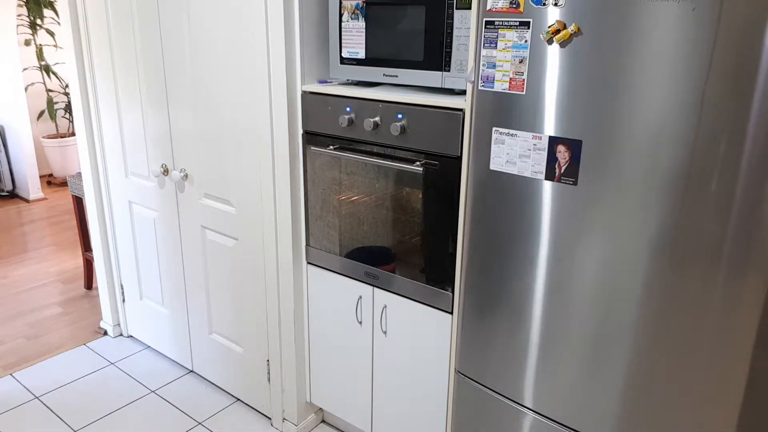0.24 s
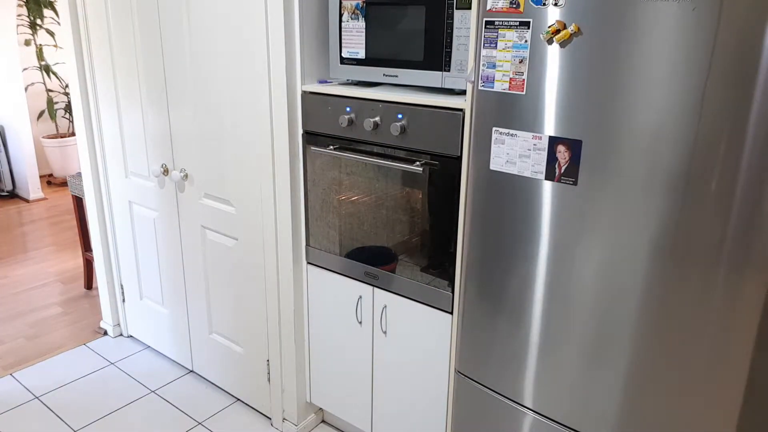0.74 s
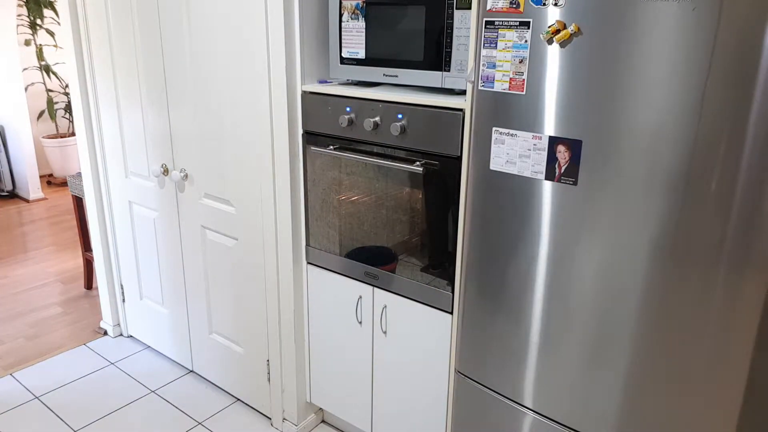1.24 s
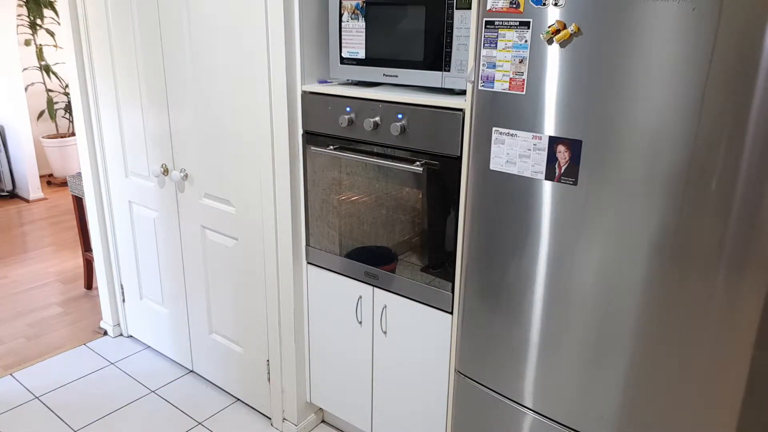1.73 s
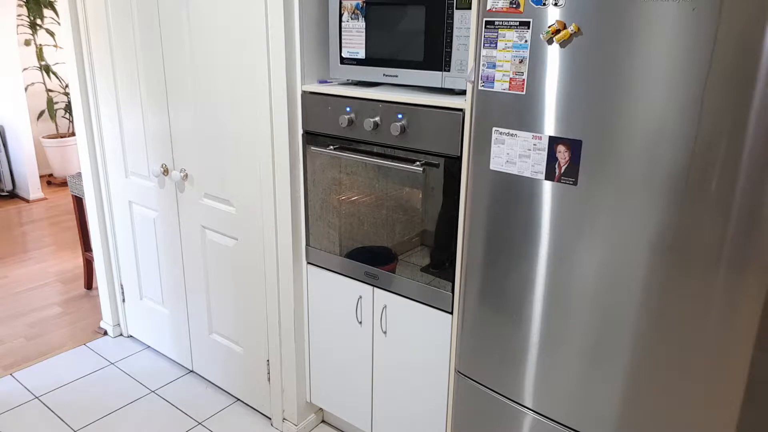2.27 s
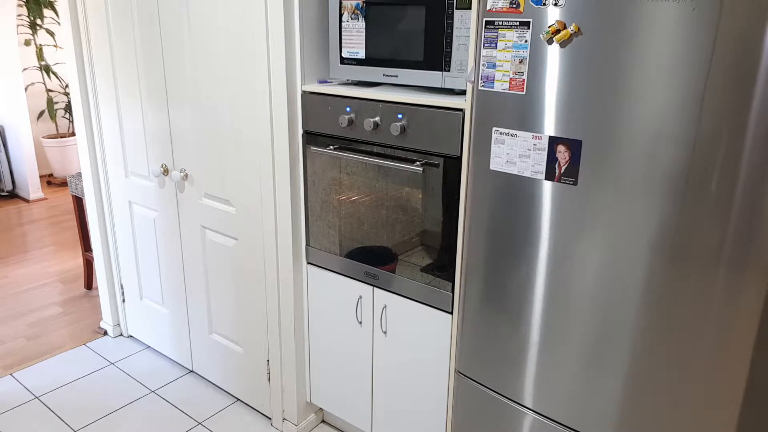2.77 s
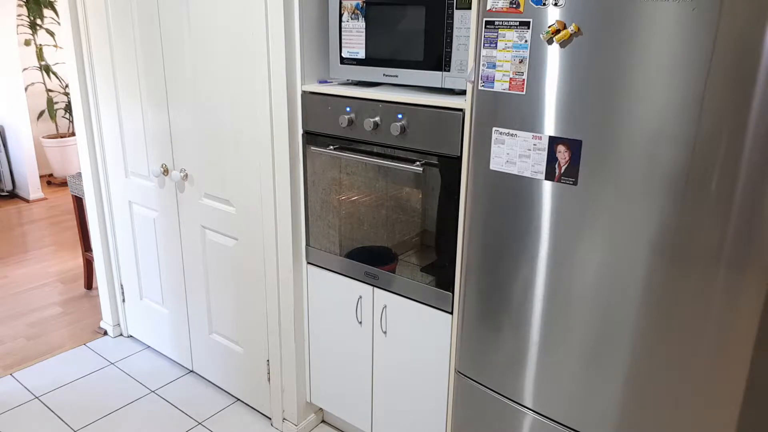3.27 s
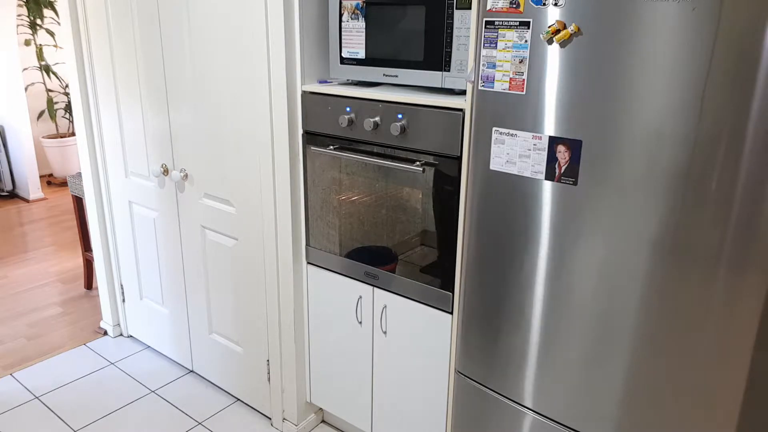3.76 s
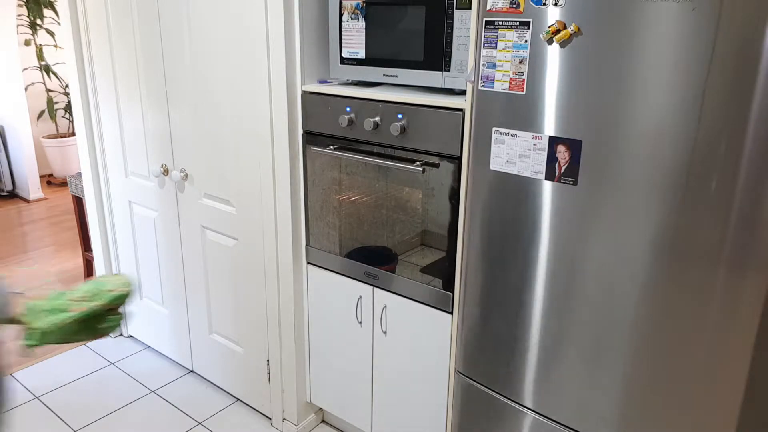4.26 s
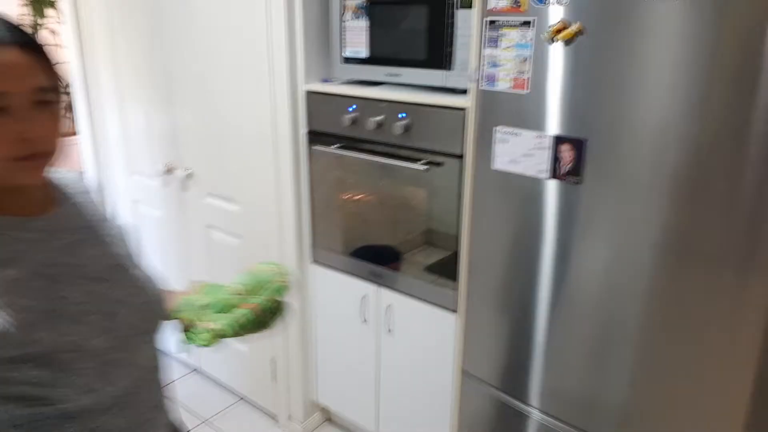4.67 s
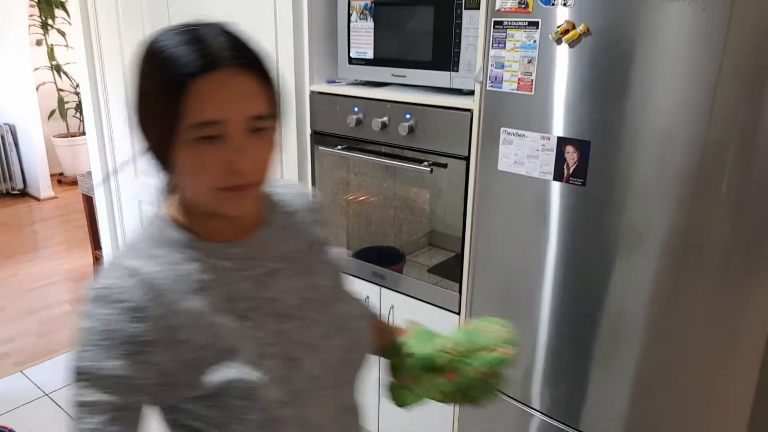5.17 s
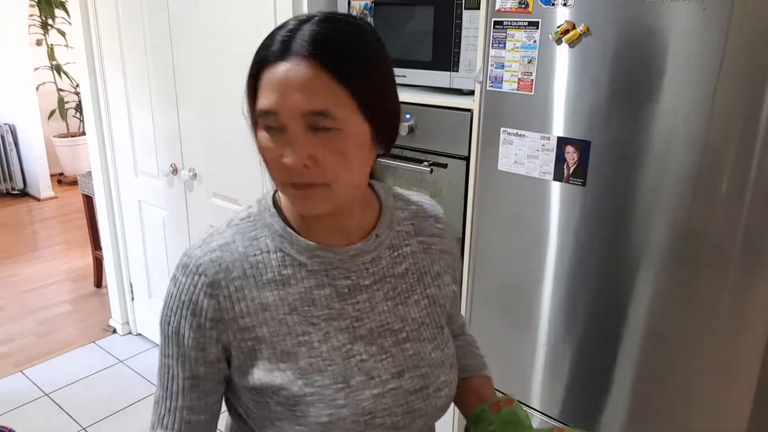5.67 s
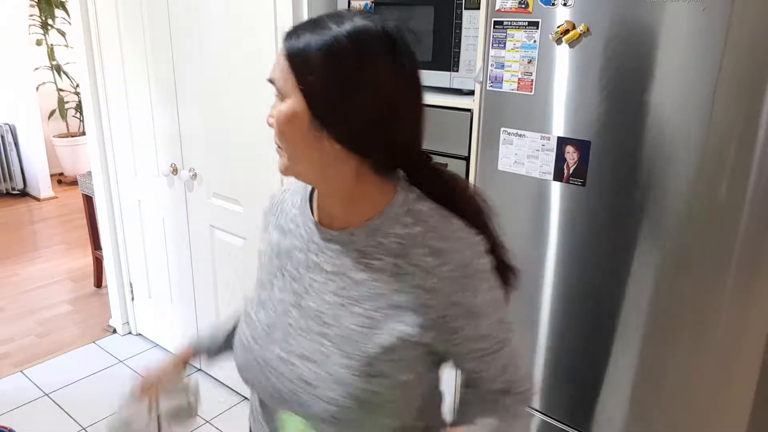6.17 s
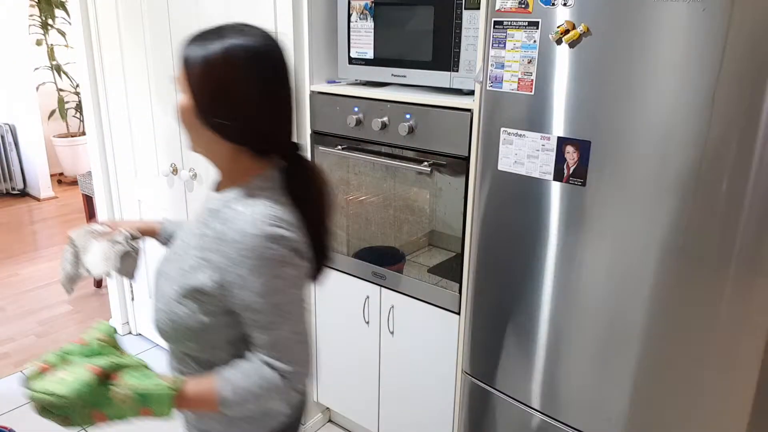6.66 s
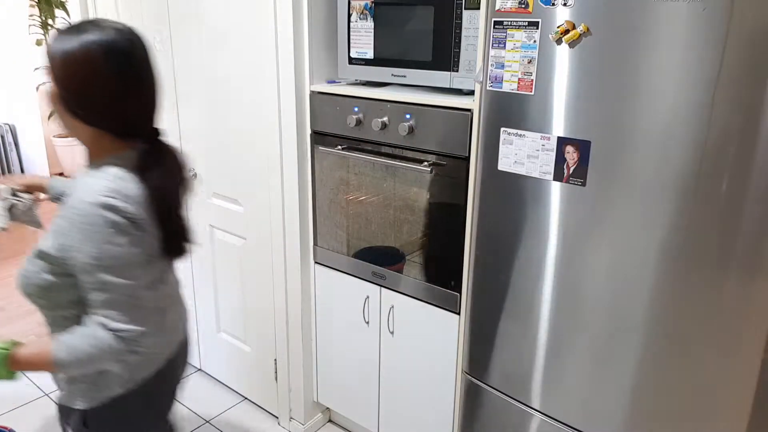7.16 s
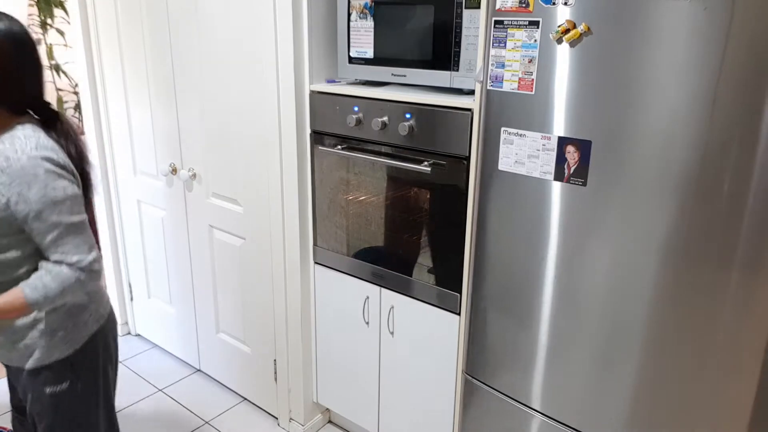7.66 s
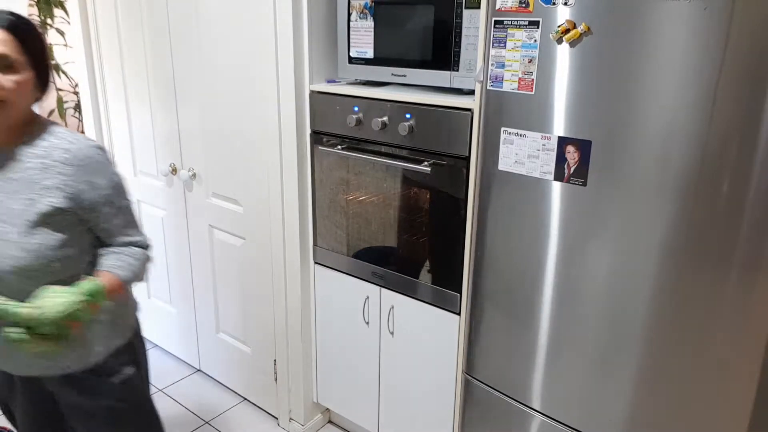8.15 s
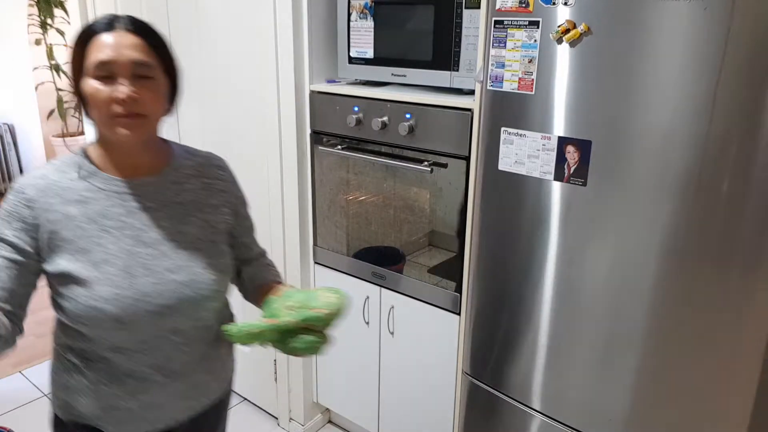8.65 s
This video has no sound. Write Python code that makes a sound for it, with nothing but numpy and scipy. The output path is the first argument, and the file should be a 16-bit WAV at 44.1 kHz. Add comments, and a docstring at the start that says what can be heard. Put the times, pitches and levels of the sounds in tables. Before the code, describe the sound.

A cupboard door slams in a kitchen, then a catch snaps and another door thuds shut, with slippers scuffing on tiles.

```python
"""Cupboard doors in a tiled kitchen.

A cupboard door slams and rebounds; later a catch snaps close by and a second door thuds shut.
Someone shuffles about in slippers, soles scuffing the tiles, over the low hum of the appliances.
The hard room rings on after every knock; two microphones a hand apart pick it up."""
import sys
import numpy as np
from scipy import signal
from scipy.fft import rfft, irfft, next_fast_len
from scipy.io import wavfile
from scipy.ndimage import uniform_filter1d, minimum_filter1d

SR = 44100
rng = np.random.default_rng(int(sys.argv[2]) if len(sys.argv) > 2 else 0)


def output_pcm(signal):
    """Save a mono or channel-first signal as 16-bit PCM at the path in sys.argv[1].

    Samples are clipped to [-1, 1] before scaling.
    """
    pcm = np.clip(np.atleast_2d(signal).T, -1, 1) * 32767
    wavfile.write(sys.argv[1], SR, np.round(pcm).astype(np.int16))


N = 392931
MIC_SPACING_M, SOUND_SPEED_M_S = 0.15, 343

# reverberation time of the kitchen: f/Hz, t60/s
KITCHEN_T60 = [(60, 1), (200, 0.53), (600, 0.32), (1500, 0.48), (3000, 0.38), (6000, 0.34), (10000, 0.38),
               (16000, 0.22)]


def slammed_door(chatter_s=0.022, chatter_db=-7.5, chatter_db_oct=-2, puff_s=0.009, puff_db=-43):
    """Each contact chatters, shaking panel and room; the hardest rings the cabinet and puffs air."""
    # door meets frame, slams home, rebounds: t/s, level/dB, tilt/(dB/oct)
    slams = [(0.6671, 14.5, 1), (0.6735, 20, 2), (0.7907, 9.5, -0.5)]
    # blow spectrum: f/Hz, level/dB
    spectrum = [(30, -20.5), (80, -7.5), (150, -4), (230, 0), (320, -3.5), (450, -5), (620, -3.5),
                (1100, -7), (2000, -6.5), (3200, -13.5), (4500, -19.5), (7000, -35.5), (9500, -35.5),
                (15500, -59)]
    # door and cabinet modes: f/Hz, level/dB, t60/s
    modes = [(107, -9, 0.7), (170, 0, 0.6), (205, -5, 0.45), (236, -2, 0.45), (406, -3, 0.5),
             (470, -3, 0.4), (508, -4, 0.4), (700, -7, 0.55), (798, 0, 0.4), (835, -4, 0.38),
             (1072, -3, 0.58), (1205, -4, 0.4), (1316, -5, 0.42), (1420, -5, 0.55), (1764, -6, 0.38),
             (1997, 1, 0.32), (2042, -5, 0.48), (2278, -6, 0.38), (3035, -7, 0.38)]
    out = np.zeros((2, N))
    for s, db, tilt_db_oct in slams:
        for k in range(3):
            blow = amp(-7) * shudder(rise_s=0.0023) + amp(-6) * room(build_s=0.0013, t60_scale=1.02)
            blow = colour(blow, spectrum, tilt_db_oct + k * chatter_db_oct)
            add(out, s + k * chatter_s, amp(db + k * chatter_db) * blow)
    s, db, _ = max(slams, key=lambda row: row[1])
    add(out, s, amp(db - 3) * ring(modes, max_t60_s=0.48))  # damped by the hinges
    age = np.arange(SR) / SR / puff_s
    add(out, s, amp(db + puff_db) * age * (2 - age) * np.exp(-age))
    return out


def catch(spring_db=-16, left_lag_s=0.00018, left_db=-2, repeat_rise_s=0.00042):
    """Near, slightly right: metal ticks and door clacks with quick repeats; a spring twangs once."""
    # snaps of catch and hinges: t/s, tick/dB, clack/dB, repeats/dB, rise/s
    snaps = [(4.6198, 8, 1.5, -27.5, 0.00039), (4.6798, 1.5, -6, 1, 0.00034),
             (4.7667, 0, -9.5, -21, 0.0019), (4.7933, -27, -12.5, -18, 0.00089),
             (4.8735, -3, -15.5, -4.5, 0.00046)]
    # quick repeats of each snap, a chatter and then a room echo: delay/s, level/dB
    repeats = [(0.005, -2), (0.0143, -1.5)]
    # echoes off bench and cabinet fronts: delay/s, level/dB
    echoes = [(0.0049, -14), (0.0087, -8), (0.0114, -16.5)]
    # metal tongue spectrum: f/Hz, level/dB
    tick_spectrum = [(300, -35), (2500, -22), (5000, -12), (7200, -9), (8100, -3), (9700, 0), (11000, -1.5),
                     (13000, -6), (16000, -14)]
    # door clack spectrum: f/Hz, level/dB
    clack_spectrum = [(20, -51), (80, -16.5), (230, 0), (430, -13), (650, -2.5), (1030, -1.5), (1250, -9),
                      (1700, -2), (2500, -3), (3900, 2.5), (6000, -0.5), (10000, -0.5), (16000, -17.5)]
    # spring modes: f/Hz, level/dB, t60/s
    spring_modes = [(1560, -5.5, 1.3), (1710, -13.5, 1.1), (4250, -8.5, 0.7)]
    events = []
    for s, tick_db, clack_db, repeats_db, rise_s in snaps:
        events.append((s, tick_db, clack_db, rise_s))
        for delay_s, db in repeats:
            gain_db = repeats_db + db
            events.append((s + delay_s, tick_db + gain_db, clack_db + gain_db, repeat_rise_s))
    out = np.zeros((2, N))

    def snap(s, db, spectrum, rise_s, tilt_db_oct, room_db):
        direct = amp(db) * unit_energy(colour(shudder(rise_s), spectrum, tilt_db_oct))
        add(out, s, direct * [[0], [1]])
        add(out, s + left_lag_s, direct * [[amp(left_db)], [0]])
        for delay_s, echo_db in echoes:
            add(out, s + delay_s, amp(echo_db) * direct)
        tail = colour(room(build_s=0.0016, t60_scale=0.82), spectrum, tilt_db_oct)
        add(out, s, amp(db + room_db) * tail)

    add(out, snaps[0][0], amp(spring_db) * ring(spring_modes, max_t60_s=1.5))
    for s, tick_db, clack_db, rise_s in events:
        snap(s, tick_db, tick_spectrum, rise_s, tilt_db_oct=4, room_db=-4)
        snap(s, clack_db, clack_spectrum, 2.27 * rise_s, tilt_db_oct=0, room_db=2)
    return out


def padded_door(panel_db=-4, room_db=-9, ring_db=-7):
    """The second door shuts on its pads: the softer the blow, the weaker the high modes."""
    # blows: t/s, level/dB, cutoff/Hz
    thuds = [(4.686, -13, 294), (4.7565, 4.5, 1220), (4.776, -13, 348), (4.7952, -4.5, 800),
             (4.848, -13.5, 199)]
    # blow spectrum: f/Hz, level/dB
    spectrum = [(20, -47.5), (45, -19), (80, -0.5), (130, -2.5), (260, 1.5), (420, -6), (680, 2), (950, -9),
                (1400, -9), (4000, -2)]
    # door modes: f/Hz, level/dB, t60/s
    modes = [(83.5, -2.5, 0.4), (123, -0.5, 0.35), (255, -4.5, 0.35), (540, -3, 0.3), (674, 4, 0.3),
             (700, -25.5, 0.35), (954, -12, 0.3), (1120, 0, 0.3)]
    out = np.zeros((2, N))
    for s, db, cutoff_hz in thuds:
        blow = amp(panel_db) * shudder(rise_s=0.0035) + amp(room_db) * room(build_s=0.0062)
        stirred = [(hz, level - 20 * np.log10(1 + (hz / cutoff_hz) ** 2), t60) for hz, level, t60 in modes]
        ringing = amp(ring_db) * ring(stirred, max_t60_s=0.27)
        add(out, s, amp(db) * (colour(blow, spectrum, cutoff_hz=cutoff_hz) + ringing))
    return out


def heels(room_db=-5, contact_s=0.003):
    """A soft heel rings the floor briefly."""
    # landings: t/s, level/dB
    landings = [(0.432, -22.5), (2.839, -8)]
    # floor modes: f/Hz, level/dB, t60/s
    modes = [(105, -5, 0.13), (186, -4, 0.14), (302.6, 5, 0.072), (343, -4, 0.039), (630, -4.5, 0.076),
             (924, -14.5, 0.1399)]
    out = np.zeros((2, N))
    for s, db in landings:
        bump = ring(modes, max_t60_s=0.4) * onset(contact_s)
        tail = signal.fftconvolve(bump[:1], room(build_s=0.0074), axes=1)[:, :SR]
        add(out, s, amp(db) * (bump + amp(room_db) * tail))
    return out


def slippers(firm_slap_db=-19.5, firm_slap_hz=3900):
    """Soles scuff, skid, squeak and slap on the tiles; gentler slaps are duller."""
    # sole brushes the tiles; the first row is a brief sound already fading as the scene begins: t/s, length/s,
    # level/dB, weight/0-1
    scuffs = [(0.0, 0.019, -51.5, 0.1), (0.2, 0.11, -53.5, 0.94), (2.65, 0.24, -55.5, 0.99),
              (3.08, 0.17, -53.5, 0.55), (3.5, 0.11, -55.5, 0.28), (3.755, 0.1, -53, 0.85),
              (4.04, 0.11, -58.5, 0.4), (4.335, 0.16, -54, 0.67), (4.5, 0.13, -50.5, 0),
              (4.98, 0.26, -63.5, 0.25), (5.095, 0.08, -59, 1), (5.25, 0.23, -49.5, 0.25),
              (5.485, 0.19, -48.5, 0.45), (5.81, 0.27, -52.5, 0.53), (6.1, 0.12, -55.5, 0.72),
              (6.49, 0.14, -58, 0.75), (6.67, 0.15, -51, 0.06), (6.915, 0.23, -40.5, 0.2),
              (7.18, 0.12, -51.5, 0.25), (7.66, 0.11, -61.5, 0.8), (8.26, 0.11, -56.5, 0.28),
              (8.46, 0.13, -55.5, 0.3)]
    # scuff motion: progress/0-1, speed/0-1
    scuff_speed = [(0, 0.13), (0.14, 0.5), (0.36, 0.95), (0.66, 0.6), (1, 0)]
    # sole lands moving and halts: t/s, length/s, level/dB, weight/0-1
    skids = [(0.15, 0.16, -51.5, 0.75), (2.84, 0.13, -51.5, 0.71), (7.408, 0.15, -39.5, 0.35),
             (8.793, 0.12, -43.5, 0.15)]
    # skid motion: progress/0-1, speed/0-1
    skid_speed = [(0, 0.1), (0.06, 0.7), (0.62, 0.8), (1, 0)]
    # sole grips the tile: t/s, length/s, level/dB
    squeaks = [(1.695, 0.07, -64), (1.837, 0.18, -60)]
    # squeak spectrum: f/Hz, level/dB
    squeak_spectrum = [(1200, -24), (2000, -6), (2400, -2), (2800, -10.5), (4000, -16), (12000, -28)]
    # loose sole lands: t/s, level/dB
    slaps = [(7.0, -16.5), (7.413, -15.5), (7.423, -14.5), (8.31, -24.5), (8.8, -17.5)]
    # slap spectrum: f/Hz, level/dB
    slap_spectrum = [(30, -71), (150, -40), (450, -11.5), (780, -5), (1200, -8), (1600, -7.5), (2300, -14),
                     (5000, -16), (15000, -9)]
    out = np.zeros((2, N))
    for strokes, profile in (scuffs, scuff_speed), (skids, skid_speed):
        for s, length_s, db, weight in strokes:
            add(out, s, sole_stroke(profile, length_s, db, weight))
    for s, length_s, db in squeaks:
        _, speed = sole_motion(scuff_speed, length_s)
        add(out, s, amp(db) * colour(rub(speed, band_hz=2394), squeak_spectrum))
    for s, db in slaps:
        blow = amp(-5) * shudder(rise_s=0.0023) + amp(-1) * room(build_s=0.0039)
        cutoff_hz = firm_slap_hz * amp(db - firm_slap_db)
        add(out, s, amp(db) * colour(blow, slap_spectrum, cutoff_hz=cutoff_hz))
    return out


def sole_stroke(profile, length_s, db, weight, easy_db=-51.5, settle_db_oct=2.5):
    """One slide: weight and vigour make it rasp; its hiss dulls as the sole settles."""
    # rasp spectrum: f/Hz, level/dB
    rasp_spectrum = [(30, -36.5), (100, -16), (300, -6), (550, -2.5), (800, -2.5), (1550, -0.5), (2200, -3),
                     (3200, -7.5), (6000, -20.5), (15000, -33.5)]
    # hiss spectrum: f/Hz, level/dB
    hiss_spectrum = [(30, -54), (200, -18), (1000, -15.5), (2500, 0), (4200, 3), (6800, -4.5), (8800, 1.5),
                     (12000, -2.5), (16000, -8.5)]
    progress, speed = sole_motion(profile, length_s)
    vigour_db = db - easy_db
    rasp_db = -12.5 + 21 * weight ** 2 + 0.57 * vigour_db
    tilt_db_oct = 4.5 - 10.5 * weight
    cutoff_hz = 17000 * amp(0.56 * vigour_db)
    sound = amp(rasp_db) * colour(rub(speed, band_hz=1200), rasp_spectrum)
    for share, extra_db_oct in (1 - progress, settle_db_oct), (progress, -settle_db_oct):
        hiss = rub(speed * np.sqrt(share), band_hz=7000)
        sound += colour(hiss, hiss_spectrum, tilt_db_oct + extra_db_oct, cutoff_hz)
    return amp(db) * sound


def sole_motion(profile, length_s):
    """Progress and speed of a stroke, both 0-1, padded for its tail."""
    progress = np.minimum(np.arange(SR * 3 // 4) / SR / length_s, 1)
    return progress, np.interp(progress, *np.transpose(profile)) * (progress < 1)


def rub(speed, band_hz, grit_db=2.5, room_db=-1):
    """Tiny slips follow the sole's speed; the room stores their power and lets it decay."""
    grit = unit_rms(amp(grit_db * smooth_noise(len(speed), size=40)))
    retained = amp(-120 / at_hz(KITCHEN_T60, band_hz) / SR)
    stored = signal.lfilter([1 - retained], [1, -retained], speed ** 2)
    power = (speed * grit) ** 2 + amp(room_db) ** 2 * stored
    return diffuse(len(speed)) * np.sqrt(power / 2)


def appliances(fan_db=-60.54, rumble_trim_db=-3):
    """Fan noise, a slowly changing rumble and steady, slightly wavering motor tones."""
    # fan spectrum: f/Hz, level/dB
    fan_spectrum = [(12, -38), (20, -7), (81, -2.5), (386, -10), (443, -12), (733, -12), (1280, -18.5),
                    (1560, -19.5), (1740, -25), (1950, -20.5), (2570, -28), (4890, -31), (6650, -38.5),
                    (8550, -29.5), (15800, -39)]
    # rumble envelope: t/s, level/dB
    rumble_levels = [(0, -55), (1.3, -58), (1.7, -70), (2.5, -53.5), (4.3, -54.5), (5.7, -64), (8.9, -55.5)]
    # rumble spectrum: f/Hz, level/dB
    rumble_spectrum = [(20, -14), (50, -0.5), (90, 1), (200, -7), (370, -5.5), (500, -12), (900, -19.5),
                       (2500, -36.5)]
    # motor tones: f/Hz, level/dB
    motors = [(92, -70.5), (301, -72), (737, -79.5), (1519, -88)]
    out = amp(fan_db) * colour(diffuse(N), fan_spectrum)
    rumble_db = np.interp(np.arange(N) / SR, *np.transpose(rumble_levels)) + rumble_trim_db
    out += amp(rumble_db) * colour(diffuse(N), rumble_spectrum)
    for hz, db in motors:
        out += amp(db) * motor_tone(hz)
    return out


def motor_tone(hz, waver_hz=0.93):
    """Slightly wavering sine."""
    drift_hz = waver_hz * smooth_noise(N, size=8000)
    return unit_rms(np.sin(2 * np.pi * np.cumsum(hz + drift_hz) / SR))


def room(build_s, t60_scale=1):
    """Reverberant tail: builds up, then decays band by band."""
    # tail spectrum: f/Hz, level/dB
    spectrum = [(100, -2), (1000, 3.5), (4000, 3), (9000, -4), (16000, -1.5)]
    hz, t, bands = signal.stft(diffuse(SR), SR, nperseg=256)
    t60_s = t60_scale * at_hz(KITCHEN_T60, hz)[:, None]
    bands = bands * amp(at_hz(spectrum, hz)[:, None] - 60 * t / t60_s)
    tail = signal.istft(bands, SR, nperseg=256)[1][:, :SR]
    return unit_energy(tail * onset(build_s))


def shudder(rise_s):
    """Dense, quickly damped vibration of a struck part."""
    age = np.arange(SR) / SR / rise_s
    return unit_energy(diffuse(SR) * age * np.exp(-age))


def ring(modes, max_t60_s):
    """Decaying modes of alternating sign; high ones reach the microphones out of step."""
    t, out = np.arange(SR) / SR, np.zeros((2, SR))
    for k, (hz, db, t60_s) in enumerate(modes):
        lag_s = np.array([[0], [rng.uniform(-.7, .7) * MIC_SPACING_M / SOUND_SPEED_M_S]])
        envelope = amp(db - 60 * t / min(t60_s, max_t60_s))
        out += (-1) ** k * envelope * np.sin(2 * np.pi * hz * (t - lag_s))
    return unit_energy(out)


def diffuse(count):
    """Noise from all sides: alike at both microphones only for long waves."""
    left, other = rfft(rng.standard_normal((2, count)))
    hz = np.fft.rfftfreq(count, 1 / SR)
    coherence = 0.86 * np.sinc(2 * hz * MIC_SPACING_M / SOUND_SPEED_M_S)
    right = coherence * left + np.sqrt(1 - coherence ** 2) * other
    return irfft([left, right], count)


def colour(x, spectrum, tilt_db_oct=0, cutoff_hz=np.inf, size=4096):
    """Minimum-phase filter of unit energy: a spectrum, tilted and low-passed."""
    hz = abs(np.fft.fftfreq(size, 1 / SR))
    db = at_hz(spectrum, hz) + tilt_db_oct * np.log2(hz / SR + 1e-3)
    gain = amp(db) / (1 + (hz / cutoff_hz) ** 2)
    taps = np.fft.ifft(np.exp(np.conj(signal.hilbert(np.log(gain))))).real
    return signal.oaconvolve(x, unit_energy(taps[:size // 2])[None], axes=1)[:, :x.shape[1]]


def smooth_noise(count, size):
    return unit_rms(uniform_filter1d(rng.standard_normal(count), size))


def onset(rise_s):
    return 1 - np.exp(-np.arange(SR) / SR / rise_s)


def amp(db):
    return 10 ** (np.asarray(db) / 20)


def unit_rms(x):
    return x / np.sqrt(np.mean(x ** 2) + 1e-20)


def unit_energy(x):
    return unit_rms(x) / np.sqrt(x.shape[-1])


def at_hz(points, hz):
    """Table lookup on a log-frequency axis."""
    f, value = np.transpose(points)
    return np.interp(np.log(hz + 1), np.log(f + 1), value)


def add(mix, s, sound):
    """Mixes a sound in at time s."""
    part = mix[:, max(round(s * SR), 0):][:, :sound.shape[-1]]
    part += sound[..., :part.shape[-1]]


def scene():
    """All sources, in stereo."""
    return slammed_door() + catch() + padded_door() + heels() + slippers() + appliances()


def record(dry, limiter_samples=45, cutoff_hz=15950):
    """Microphone pair, the left more sensitive; fast peak limiter; low-pass."""
    # sensitivity, left over right: f/Hz, level/dB
    imbalance = [(40, 1.5), (120, 1), (300, 3), (700, 6.5), (1300, 5), (4000, 3), (9000, 4.5), (15000, 0.5)]
    count = next_fast_len(N + SR)
    imbalance_db = at_hz(imbalance, np.fft.rfftfreq(count, 1 / SR))
    mic_gain = amp(imbalance_db * np.array([[.5], [-.5]]))
    heard = irfft(rfft(dry, count) * mic_gain, count)[:, :N]
    allowed = 1 / np.maximum(abs(heard).max(0), 1)
    limiter_gain = uniform_filter1d(minimum_filter1d(allowed, limiter_samples), limiter_samples)
    taps = signal.firwin(511, cutoff_hz, window=("kaiser", 9), fs=SR)
    return signal.oaconvolve(heard * limiter_gain, taps[None], "same", axes=1)


dry = scene()
out = record(dry)
output_pcm(out)
```